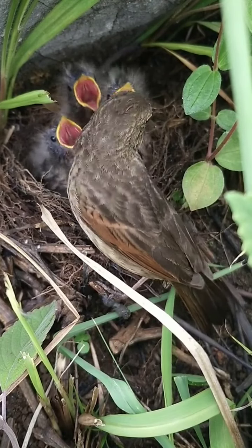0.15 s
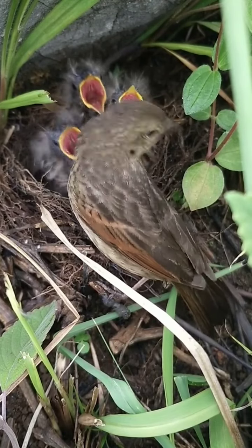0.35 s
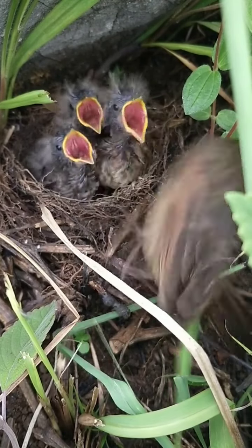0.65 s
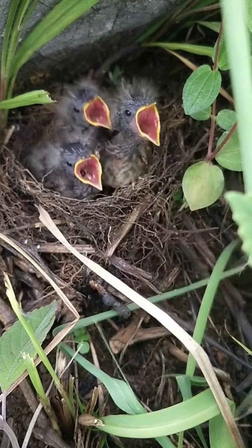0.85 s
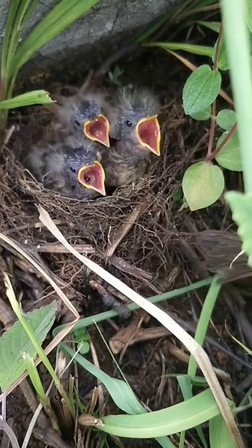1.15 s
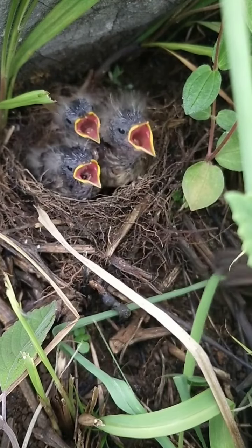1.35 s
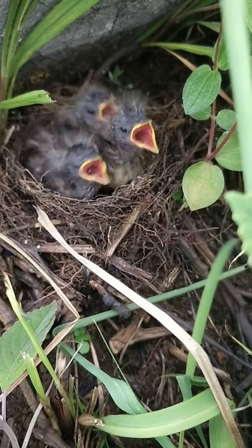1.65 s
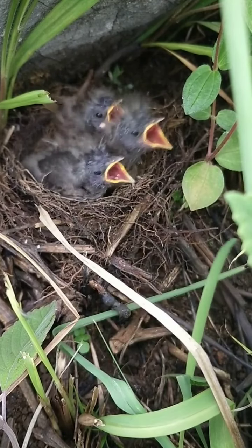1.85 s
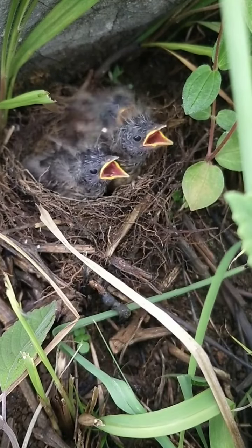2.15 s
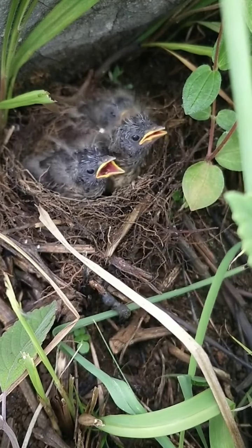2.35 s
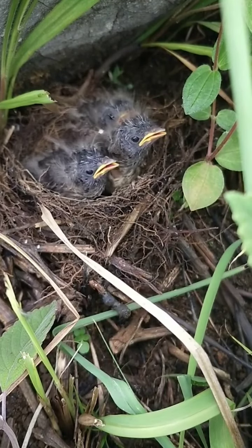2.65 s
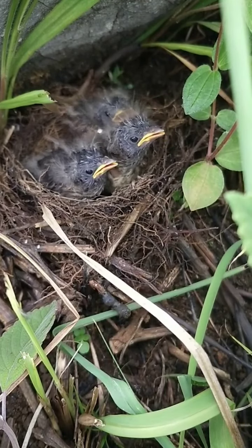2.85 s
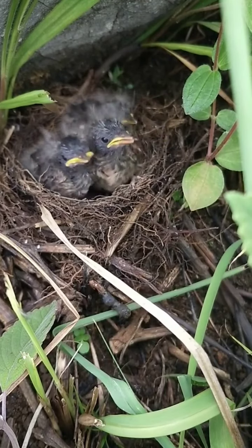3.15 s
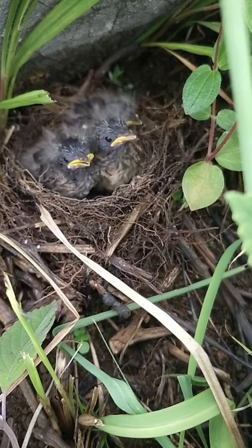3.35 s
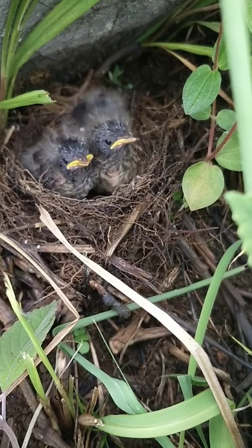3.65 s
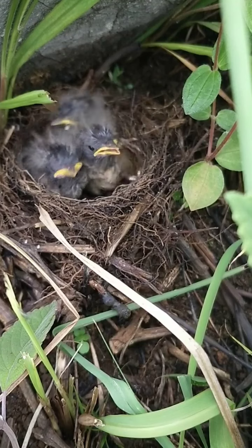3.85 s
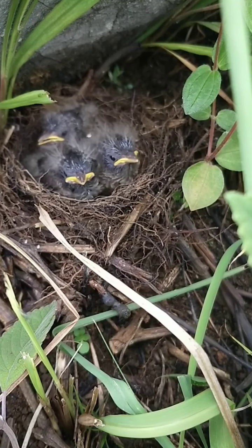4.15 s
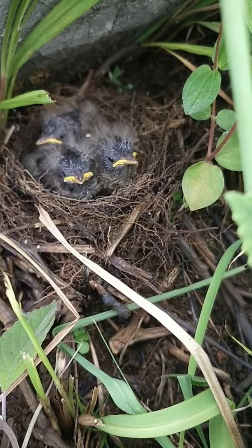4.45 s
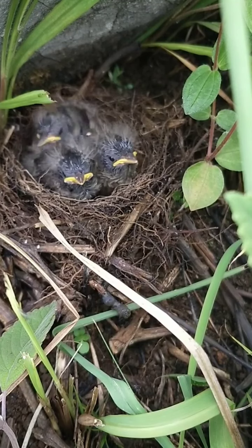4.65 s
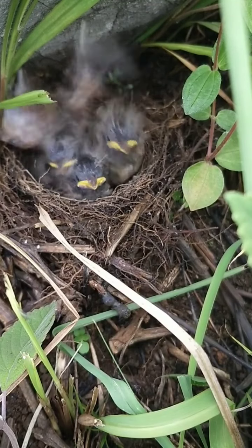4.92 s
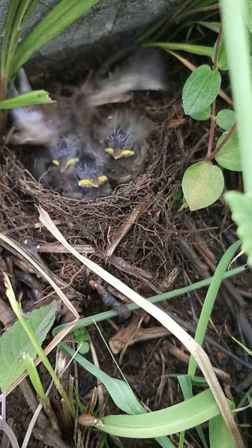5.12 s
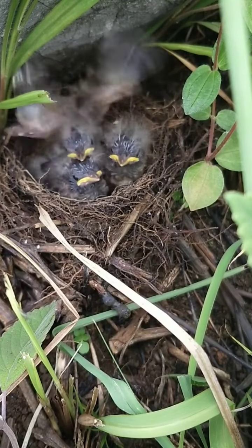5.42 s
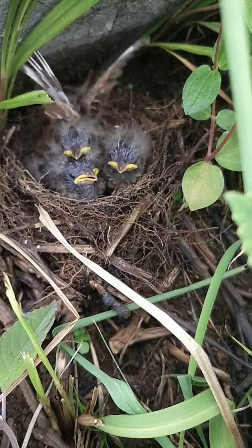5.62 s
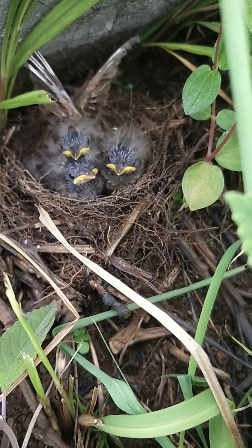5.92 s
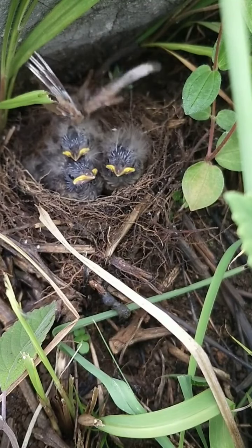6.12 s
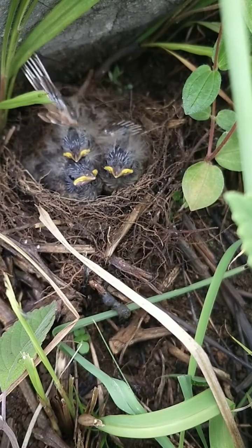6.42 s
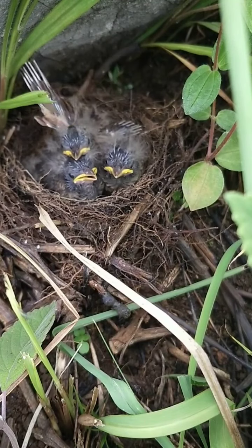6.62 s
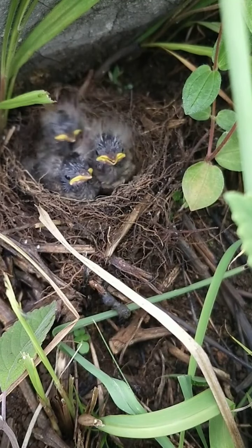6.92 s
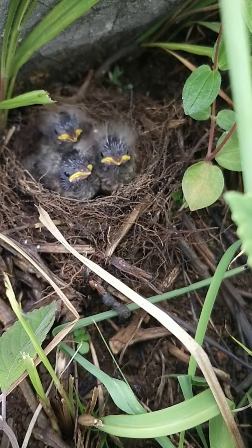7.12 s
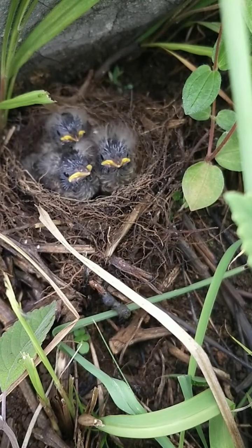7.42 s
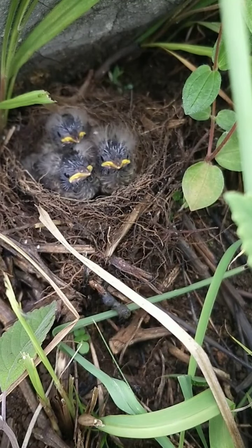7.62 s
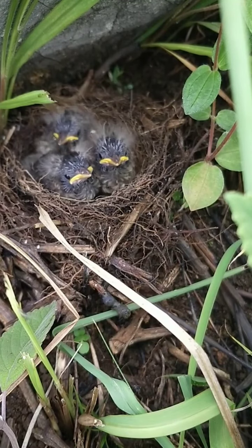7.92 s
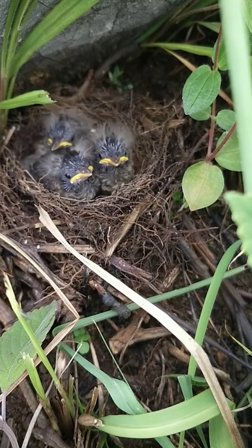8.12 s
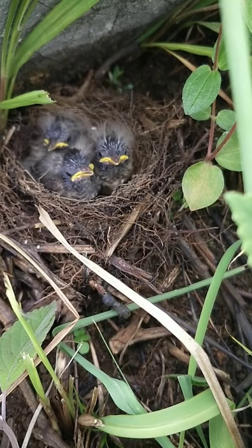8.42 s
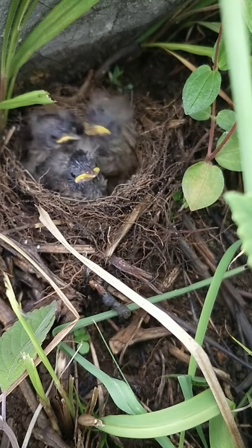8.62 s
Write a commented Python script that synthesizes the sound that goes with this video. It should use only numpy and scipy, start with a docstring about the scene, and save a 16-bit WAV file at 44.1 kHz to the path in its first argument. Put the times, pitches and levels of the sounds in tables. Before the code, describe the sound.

Very close to a ground nest outdoors, baby birds cheep in a quick cluster at once, then a pair together. Around one and a half seconds the parent leaves with a soft, fast, low wing flutter, followed by a much fainter one. After that single piercing, falling cheeps come roughly every half second to one and a half seconds. Small twig ticks and low bumps are dotted through, over faint, wide stereo hiss.

```python
"""Ground nest outdoors: nestlings cheep for food, close to a pair of microphone ports.
Each cheep is a rising and falling catch, then a falling two-voice whistle shaken by pitch flicks.
Some end in a faint tail (slide, shelf, climb, hook) or a low sag; overtones and rasp pass a throat filter.
The parent flies off in two flutters: repeated wing-stroke throbs plus feather noise.
Twigs tick as noise scrapes over low thumps; patchy stereo hiss lies under all."""
import sys
import numpy as np
from scipy import signal
from scipy.fft import rfft, irfft, next_fast_len
from scipy.io import wavfile
from scipy.ndimage import uniform_filter1d, minimum_filter1d

SR = 44100
rng = np.random.default_rng(int(sys.argv[2]) if len(sys.argv) > 2 else 0)


def digitize_waveform(pressure):
    """Quantize a signal to 16-bit integers and store it at the path in sys.argv[1].

    Rows of a 2-D input are taken as channels; values are limited to [-1, 1].
    """
    field = np.atleast_2d(pressure).T
    bounded = np.clip(field, -1, 1)
    quanta = np.round(bounded * 32767).astype(np.int16)
    wavfile.write(sys.argv[1], SR, quanta)


N = 386757

# Cheeps. Each row: start in seconds, time to crest in seconds, catch length in seconds, fall length in seconds,
# start pitch in Hz, crest in Hz, top of fall in Hz, bottom in Hz, bend of fall (power of time),
# catch level in dB, loudest level of fall in dB, swell in dB, loudest point as share of fall (0-1), fade in dB,
# second voice above first at top in Hz, the same at bottom in Hz, second voice re first in dB,
# left minus right in dB (added to the port shading).
CHEEPS = [(0.236, 0.011, 0.02, 0.14, 3915, 6025, 5467, 3466, 0.87, -17, -11.5, 5.5, .5, 12, 1100, 645, -8, -1.5),
          (0.298, 0.0033, 0.01, 0.13, 5774, 6074, 5470, 4100, 0.98, -30, -19, 1, .2, 6.6, 1254, 1542, -6, 0),
          (0.447, 0.0064, 0.017, 0.14, 4920, 5860, 5580, 4156, 1.68, -11.5, -12.5, 3.5, .25, 14.8, 600, 1160, -9, -2),
          (1.164, 0.012, 0.024, 0.126, 4164, 6100, 5386, 3594, 1.04, -14.5, -14.5, 1.6, 0.21, 13, 92.8, 588, -7.5, 3),
          (1.163, 0.0071, 0.026, 0.19, 5460, 6850, 6530, 5990, 1.4, -19.5, -25.5, 1, .1, 9, 600, 800, -13, -1.5),
          (1.628, 0.012, 0.024, 0.17, 3200, 6800, 5820, 4180, 1.09, -14.5, -14.5, 7, .2, 14.3, 680, 1200, -13, -2),
          (2.810, 0.0089, 0.013, 0.16, 4000, 6120, 5754, 4446, 1.15, -12, -11, 0.57, .1, 11.8, 640, 852, -18.5, -1.2),
          (3.410, 0.009, 0.03, 0.073, 5430, 6700, 5257, 4350, 1.23, -22, -10, 2.13, .15, 2, 1300, 948, -17, 0),
          (4.094, 0.009, 0.016, 0.15, 6080, 6410, 5385, 4252, 1.06, -29.5, -8, 7.2, .4, 9, 580, 623, -20.5, -6),
          (4.759, 0.01, 0.029, 0.081, 5420, 6775, 5270, 4537, 1.12, -23.5, -10, 2, .15, 2.17, 1397, 899, -17.5, -0.3),
          (5.6, 0.011, 0.03, 0.092, 4925, 6716, 5310, 4434, 0.98, -21, -10, 2.16, .6, 5.4, 1412, 1254, -24, -0.3),
          (6.624, 0.01, 0.027, 0.087, 5980, 6800, 5380, 4250, 1, -23.5, -10, 2.3, .5, 8, 1294, 748, -19, -0.6),
          (6.869, 0.008, 0.012, 0.132, 4090, 5236, 5180, 2740, 1.63, -17.5, -10, 3.4, 0.43, 16, 560, 700, -27.5, 0.5),
          (7.013, 0.015, 0.03, 0.11, 4406, 6010, 5965, 4023, 1.1, -20, -14, 9.6, .75, 5, 680, 1009, -16, -1),
          (8.365, 0.016, 0.026, 0.093, 5700, 6690, 5317, 4313, 0.95, -26, -13.5, 3.5, .6, 6.6, 1430, 1460, -16.5, 0.1),
          (8.643, 0.012, 0.021, 0.106, 5610, 6400, 4980, 3340, 2.14, -30.5, -10, 3.4, 0.19, 4.4, 620, 1106, -18.5, -1)]
# Faint tails after cheeps. Each row: start in seconds, shelf length in seconds, high length in seconds,
# start pitch in Hz, shelf in Hz, high in Hz, shelf level in dB, high level in dB, hook level in dB,
# left minus right in dB (added to the port shading).
TAILS = [(0.401, 0.058, 0.012, 4075, 5130, 5180, -24, -25, -25.5, -7.5),
         (0.607, 0.036, 0.067, 4540, 5515, 6400, -22, -21, -40.5, 0),
         (1.336, 0.045, 0.033, 4940, 5030, 5300, -28, -26.5, -35, 5),
         (1.334, 0.022, 0.061, 6540, 6254, 6640, -23.5, -23.5, -38.5, -3),
         (1.796, 0.04, 0.039, 5180, 5560, 6280, -27, -23.5, -43.5, 0.5),
         (2.987, 0.015, 0.041, 5150, 5330, 6110, -27, -29, -47, 2.5),
         (3.547, 0.018, 0.081, 5830, 5450, 6520, -21.5, -32, -29.5, -1.1),
         (4.263, 0.016, 0.047, 5100, 5240, 6220, -32.5, -38.5, -42, 6),
         (4.897, 0.027, 0.066, 5440, 5650, 6440, -22, -39.5, -26.5, 1.5),
         (5.723, 0.039, 0.073, 4400, 5450, 6430, -22, -35, -35.5, -0.1),
         (6.771, 0.014, 0.055, 5440, 5300, 6480, -24, -35, -40.5, -0.5),
         (7.163, 0.019, 0.039, 4960, 5200, 6260, -38, -39.5, -50, -3),
         (8.487, 0.026, 0.056, 4350, 5560, 6400, -24, -38.5, -45, -0.5)]
# Weak low sags. Each row: start in seconds, length in seconds, start pitch in Hz, end pitch in Hz,
# level in dB, left minus right in dB (added to the port shading).
SAGS = [(3.515, 0.026, 3677, 3040, -25, 3), (4.879, 0.016, 3500, 3170, -25.5, 1.7),
        (6.735, 0.028, 3495, 3050, -25.5, 2.6)]
# Quick flicks of the syrinx, single or in even bursts. Each row: first flick in seconds, last in seconds,
# flicks per second, first pitch step in Hz, last pitch step in Hz, level step in dB.
FLICK_BURSTS = [(0.26, 0.26, 40, 900, 900, -3), (0.4663, 0.54, 40.7, 1000, 700, -3),
                (0.5887, 0.6124, 42.2, 700, 790, -2), (1.181, 1.181, 40, -800, -800, -4),
                (1.6755, 1.752, 39.2, 500, 900, -5), (1.7853, 1.7853, 40, 830, 830, -4),
                (2.8321, 2.8783, 43.3, 1200, 400, -8), (2.9766, 3.0063, 33.7, 835, 475, 3),
                (4.116, 4.116, 40, 500, 500, 4), (4.1295, 4.1735, 45.5, 1400, 300, -10),
                (4.221, 4.2575, 54.8, 900, 350, -5), (5.6771, 5.6771, 40, 350, 350, -1),
                (6.8812, 6.8812, 40, 900, 900, -12), (6.888, 6.888, 40, -600, -600, 1),
                (6.8945, 6.8945, 40, 500, 500, -3), (7.036, 7.036, 40, -900, -900, -3),
                (7.06, 7.1092, 40.6, 950, 920, -10), (7.139, 7.139, 40, 500, 500, -4),
                (8.4702, 8.5027, 30.8, 550, 700, -5), (8.6625, 8.6625, 40, -900, -900, -4),
                (8.6695, 8.6695, 40, 350, 350, 0), (8.6767, 8.6767, 40, -600, -600, -3),
                (8.6828, 8.6828, 40, 450, 450, 0)]
# Throat and beak filter for overtones and rasp. Each row: frequency in Hz, gain in dB.
THROAT = [(1800, -43), (2600, -15.5), (4000, -5), (5500, 6), (7000, -11.5), (8500, -16.5), (10000, -36.5),
          (11500, -26), (15000, -40.5)]
# Shading by microphone body and nest rim. Each row: frequency in Hz, left minus right in dB.
SHADE = [(3000, -2), (3500, -8.5), (4250, 3), (5750, 3.5), (6250, 2.5), (6750, -6.5), (7500, -1.5)]
# Level of each flight, one list a flight. Each row: time in seconds, level in dB.
FLIGHTS = [
    [(1.596, -43), (1.666, -36), (1.76, -41), (1.83, -37.5), (2.0, -42), (2.15, -42), (2.33, -48.5)],
    [(2.424, -55.5), (2.5, -55.5), (2.62, -56.5), (2.72, -70)],
]
# Wing beats of each flight, in beats per second.
BEATS_PER_S = [19.05, 17.]
# Shape of the rush of air through feathers. Each row: frequency in Hz, relative density in dB per Hz.
FEATHERS = [(90, -31.5), (170, 1), (600, -18), (1500, -19.5), (6500, -32), (9000, -45), (15000, -50)]
# Twigs and feet in the nest. Each row: time in seconds, scrape level in dB, thump level in dB.
TICKS = [(0.388, -68, -62), (0.706, -40.5, -56.5), (0.749, -44, -60), (1.425, -38, -53), (4.825, -62, -49),
         (4.868, -52, -42), (5.512, -41.5, -61), (8.088, -48.5, -80.5), (8.244, -71, -64)]
# Shape of the background hiss. Each row: frequency in Hz, relative density in dB per Hz.
HISS = [(25, -13.5), (120, -2.5), (400, -10.5), (1100, -14.5), (6500, -21.5), (9000, -28.5), (13500, -24),
        (15700, -38.5)]

CATCH_IN_DB, SHOULDER_HZ = -6.5, 500  # catch starts softer than its crest, joins the fall from above
CATCH_GAP_HZ, CATCH_SECOND_DB = 1072, -13  # gap: second voice above first
ATTACK_S, FADE_BEND = 0.0034, 1.5  # bends are powers of time
GAP_BEND = 2.5  # voices drift apart or together late in the fall
SECOND_HOLDS = 0.36  # share of swell and fade that the second voice does not follow
SLIDE_S, CLIMB_S, HOOK_S = 0.017, 0.016, 0.009  # upper limits; short tails use less
HOOK_FALL_HZ, HIGH_FADE_DB = 970, 6
TAIL_GAP_HZ, SHELF_SECOND_DB, HIGH_SECOND_DB = 650, -10.5, -28.5
SAG_GAP_HZ, SAG_SECOND_DB = 1200, -5.5
FLICK_SIGMA_MS = 2.5
BAND_EDGE_HZ = 15750


def cheep(start_s, to_crest_s, catch_s, fall_s, from_hz, crest_hz, top_hz, bottom_hz, bend, catch_db,
          peak_db, swell_db, loudest, fade_db, gap_hz, end_gap_hz, second_db, pan_db):
    """Lays out catch and fall as (s, Hz, dB, second voice gap Hz, second voice dB) and sings them."""
    shoulder_s = max(catch_s - ATTACK_S, (to_crest_s + catch_s) / 2)
    rows = [(start_s, from_hz, catch_db + CATCH_IN_DB, CATCH_GAP_HZ, CATCH_SECOND_DB),
            (start_s + to_crest_s, crest_hz, catch_db, CATCH_GAP_HZ, CATCH_SECOND_DB),
            (start_s + shoulder_s, top_hz + SHOULDER_HZ, catch_db, gap_hz, CATCH_SECOND_DB)]
    loudest = np.clip(loudest, .05, .95)
    for u in np.linspace(0, 1, num=10):
        if u < loudest:
            lost_db = swell_db * (1 - u / loudest)
        else:
            lost_db = fade_db * ((u - loudest) / (1 - loudest)) ** FADE_BEND
        rows.append((start_s + catch_s + u * fall_s,
                     top_hz + (bottom_hz - top_hz) * u ** bend,
                     peak_db - lost_db,
                     gap_hz + (end_gap_hz - gap_hz) * u ** GAP_BEND,
                     second_db + SECOND_HOLDS * lost_db))
    return note(rows, pan_db, catch_s)


def tail(start_s, shelf_s, high_s, from_hz, shelf_hz, high_hz, shelf_db, high_db, hook_db, pan_db):
    """Lays out slide, shelf, climb and falling hook in the same columns and sings them."""
    shelf_end_s = start_s + shelf_s
    end_s = shelf_end_s + high_s
    slid_s = start_s + min(SLIDE_S, shelf_s / 2)
    climbed_s = shelf_end_s + min(CLIMB_S, high_s / 3)
    hook_s = end_s - min(HOOK_S, high_s / 3)
    return note([(start_s, from_hz, shelf_db, TAIL_GAP_HZ, SHELF_SECOND_DB),
                 (slid_s, shelf_hz, shelf_db, TAIL_GAP_HZ, SHELF_SECOND_DB),
                 (shelf_end_s, shelf_hz, shelf_db, TAIL_GAP_HZ, SHELF_SECOND_DB),
                 (climbed_s, high_hz, high_db, TAIL_GAP_HZ, HIGH_SECOND_DB),
                 (hook_s, high_hz, high_db - HIGH_FADE_DB, TAIL_GAP_HZ, SHELF_SECOND_DB),
                 (end_s, high_hz - HOOK_FALL_HZ, hook_db, TAIL_GAP_HZ, SHELF_SECOND_DB)], pan_db)


def sag(start_s, length_s, from_hz, to_hz, db, pan_db):
    """A plain short slide downward."""
    return note([(start_s, from_hz, db, SAG_GAP_HZ, SAG_SECOND_DB),
                 (start_s + length_s, to_hz, db, SAG_GAP_HZ, SAG_SECOND_DB)], pan_db)


def note(rows, pan_db, catch_s=0):
    """Two whistling voices, mostly the two membranes of the syrinx, but a second chick singing nearly in unison
    where the gap is small; overtones and noise pass the throat; then the two ports."""
    s, *columns = np.transpose(rows)
    t = np.arange(s[0] - .014, s[-1] + 0.0042, 1 / SR)
    count = len(t)
    hz, db, gap_hz, second_db = (np.interp(t, s, c) for c in columns)
    flick_s, step_hz, step_db = flicks()
    flick = np.exp(-.5 * ((t[:, None] - flick_s) * 1e3 / FLICK_SIGMA_MS) ** 2)

    # a fast, fairly even tremor rides on the glide
    tremor_hz = 58.0 + 15. * wobble(count, hz=20.)
    tremor = np.sin(2 * np.pi * (rng.random() + np.cumsum(tremor_hz) / SR))
    hz = hz + flick @ step_hz + 75. * tremor + 40. * wobble(count, hz=70.)
    upper_hz = hz + gap_hz * (1 + 0.13 * wobble(count, hz=126.0))
    low, high = 2 * np.pi * np.cumsum([hz, upper_hz], axis=1) / SR  # phases
    second = amp(np.minimum(second_db, 0) + 1.3 * wobble(count, hz=95.5))
    voice = amp(0.99 * wobble(count, hz=120.)) * np.cos(low) + second * np.cos(high)

    # membranes close unevenly and pull on each other: octave, sum and difference tones
    coupled = np.cos(low + high) + amp(-15.5) * np.cos(2 * low - high)
    overtones = amp(-29.0) * np.cos(2 * low) + second * coupled
    overtones *= 1 + .4 * wobble(count, hz=300.)

    has_catch = catch_s > 0
    # while the membranes settle, every other swing is stronger: a tone at half the pitch
    half_pitch_db = -14 - 1800.0 * np.maximum(t - s[0] - catch_s, 0)
    roughness = 1 + 1.3 * wobble(count, hz=400.)
    overtones += has_catch * roughness * amp(half_pitch_db) * np.cos(low / 2)

    # noise hugging the whistle, and a patchy rasp that grows with the second voice
    hugging = amp(-22.5) * wobble(count, hz=900.) * np.cos(low)
    onset_db = 13.0 * has_catch * np.exp(-abs(t - s[0]) / 0.098)
    rasp_db = -4 + 2.7 * wobble(count, hz=44.8) + onset_db
    rasp = amp(rasp_db) * second ** 1.3 * rng.standard_normal(count)

    edge = np.clip(np.minimum(t - s[0] + 0.0035, t[-1] - t) / 0.0044, 0, 1)
    # soft noise starts fading in about 10 ms before the whistle
    noise_edge = np.clip(np.minimum((t - t[0]) / 0.0073, (t[-1] - t) / 0.0023), 0, 1) ** 2
    sound = edge * (voice + coloured(overtones, THROAT)) + noise_edge * coloured(hugging + rasp, THROAT)
    sound = np.sqrt(2) * amp(db + flick @ step_db) * sound
    return t[0], at_ports(np.pad(sound, (0, 2000)), pan_db)


def flicks():
    """Every flick of every burst: times in s, pitch steps in Hz, level steps in dB."""
    rows = []
    for first_s, last_s, rate_per_s, first_hz, last_hz, db in FLICK_BURSTS:
        for s in np.arange(first_s, last_s + .3 / rate_per_s, 1 / rate_per_s):
            step_hz = np.interp(s, [first_s, last_s + 1e-9], [first_hz, last_hz])
            rows.append((s, step_hz, db))
    return np.transpose(rows)


def at_ports(sound, pan_db):
    """Level and arrival time differ at the ports: shading splits the level, the left port lags."""
    f_hz = np.fft.rfftfreq(len(sound), 1 / SR)
    half = amp((read(SHADE, f_hz) + pan_db) / 2)
    lag_us = 399.5 + 7.3 * pan_db  # the right port is nearer the nest
    left = half * np.exp(-2j * np.pi * f_hz * lag_us * 1e-6)
    ports = np.array([left, 1 / half]) / np.sqrt((half ** 2 + half ** -2) / 2)
    return irfft(ports * rfft(sound), len(sound))


def leaves(x):
    """Stone and leaves round the nest scatter a short tail: decaying noise taps, another set for each port."""
    t = np.arange(SR // 5) / SR
    taps = rng.standard_normal((2, len(t))) * amp(-60 * t / 0.072) * (t > .002)
    return signal.oaconvolve(x, taps / np.linalg.norm(taps[0]), axes=1)[:, :N]


def flight(rows, beats_per_s):
    """Each stroke is the same falling throb of pushed air, with a rush through the feathers."""
    s, db = np.transpose(rows)
    t = np.arange(s[0], s[-1], 1 / SR)
    stroke = (t - s[0]) * beats_per_s % 1
    turn = 2 * np.pi * (6.6 * stroke - 2.5 * stroke ** 2)
    swing = np.sin(np.pi * stroke ** 0.3) + 0.26
    tone = np.sin(turn) + 0.26 * np.sin(2 * turn) + 0.24 * np.sin(3 * turn)
    throb = swing * amp(1.4 * wobble(len(t), hz=37.0)) * tone
    shared, left, right = rng.standard_normal((3, len(t)))
    air = shared + 1.1 * np.array([left, right])
    rush = evened(coloured(air, FEATHERS)) * (0.99 + swing)
    whole = evened(throb) + amp(-10.5) * rush
    return s[0], amp(np.interp(t, s, db)) * whole * signal.windows.tukey(len(t), .08)


def tick(scrape_db, thump_db):
    """A soft scrape of twig (noise, one per port) with a low thump (noise, shared) under it."""
    t = np.arange(4000) / SR
    scrape_shape = [(300, -6.0), (2000, -2), (15000, -18.0)]  # (Hz, dB)
    thump_shape = [(30, -18), (90, -1), (500, -5.5), (1300, -16), (4000, -55)]
    scrape = evened(coloured(rng.standard_normal((2, len(t))), scrape_shape))
    thump = evened(coloured(rng.standard_normal(len(t)), thump_shape))
    body = scrape * amp(scrape_db - 60 * t / 0.039) + thump * amp(thump_db - 60 * t / 0.24)
    return (1 - np.exp(-t / 0.0022)) * body


def hiss():
    """Far leaves and the microphones' own noise: unlike in the two ports, with shared patches of level."""
    f_hz = np.fft.rfftfreq(1024, 1 / SR)
    a, b, c, d, patches = rng.standard_normal((N // 256 + 5, 513, 5)).T
    patches = uniform_filter1d(patches, size=14, axis=0)
    patches = evened(uniform_filter1d(patches, size=10, axis=1))
    level_db = read(HISS, f_hz)[:, None] + 1.7 * patches
    z = np.array([a + 1j * b, c + 1j * d]) * amp(level_db)
    noise = signal.istft(z, nperseg=1024, noverlap=768)[1][:, :N]
    return amp(-57.0) * evened(noise)


def amp(db):
    """dB to amplitude factor."""
    return 10 ** (np.asarray(db) / 20)


def evened(x):
    """Scales x to rms 1."""
    return x / np.sqrt(np.mean(x ** 2) + 1e-20)


def read(points, hz):
    """Reads a (Hz, value) table along log frequency."""
    f_hz, value = np.transpose(points)
    return np.interp(np.log(hz + 1), np.log(f_hz + 1), value)


def coloured(x, points):
    """Filters x by a (Hz, dB) table."""
    size = next_fast_len(x.shape[-1])
    gain = amp(read(points, np.fft.rfftfreq(size, 1 / SR)))
    return irfft(rfft(x, size) * gain, size)[..., :x.shape[-1]]


def wobble(count, hz):
    """Low-passed noise of rms 1, up to about hz."""
    b, a = signal.butter(2, hz, fs=SR)
    return evened(signal.lfilter(b, a, rng.standard_normal(count + 400))[400:])


def add(mix, s, sound):
    """Adds sound to mix from time s, cut at the end."""
    part = mix[..., round(s * SR):][..., :sound.shape[-1]]
    part += sound[..., :part.shape[-1]]


def scene():
    """Sums nestlings with their scattered tail, flights, ticks and hiss."""
    chicks, nest = np.zeros((2, 2, N))
    for row in CHEEPS:
        add(chicks, *cheep(*row))
    for row in SAGS:
        add(chicks, *sag(*row))
    for row in TAILS:
        add(chicks, *tail(*row))
    for rows, beats_per_s in zip(FLIGHTS, BEATS_PER_S):
        add(nest, *flight(rows, beats_per_s))
    for s, scrape_db, thump_db in TICKS:
        add(nest, s, tick(scrape_db, thump_db))
    return chicks + amp(-11.5) * leaves(chicks) + nest + hiss()


def record(dry):
    """Full level during and just after loud sounds, up to 6 dB less in the quiet; limiter, bass cut, band limit."""
    power = abs(uniform_filter1d((dry ** 2).mean(0), size=800))
    power_db = 10 * np.log10(power + 1e-12)
    fall_db = np.arange(N) * 129.0 / SR  # memory of a loud sound fades 129 dB a second
    memory_db = np.maximum.accumulate(power_db + fall_db) - fall_db
    eased = dry * amp(np.clip(.3 * (memory_db + 42.), -6., 0))
    crest = -minimum_filter1d(-abs(eased).max(0), size=200)
    limited = eased / uniform_filter1d(np.maximum(crest / .9, 1), size=100)
    low_cut = signal.sosfilt(signal.butter(2, 45., "high", fs=SR, output="sos"), limited)
    band = signal.firwin(511, BAND_EDGE_HZ, window=("kaiser", 9), fs=SR)
    return signal.oaconvolve(low_cut, band[None], "same")


dry = scene()
out = record(dry)
digitize_waveform(out)
```